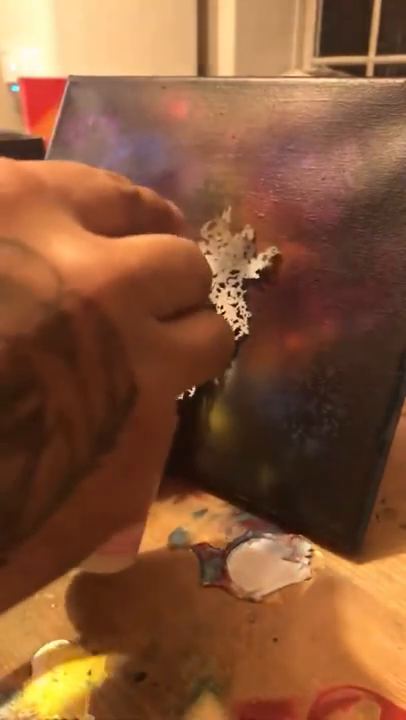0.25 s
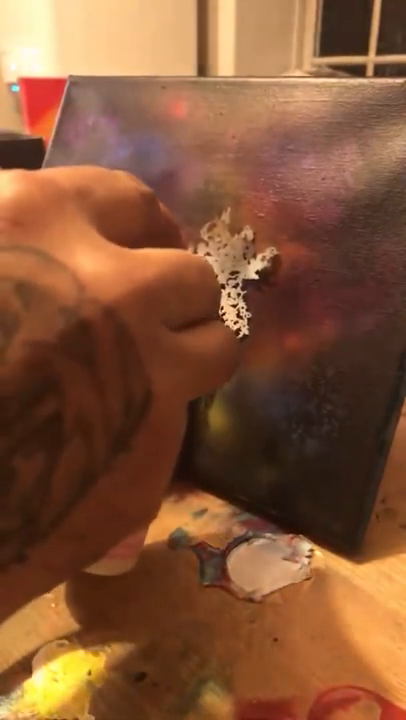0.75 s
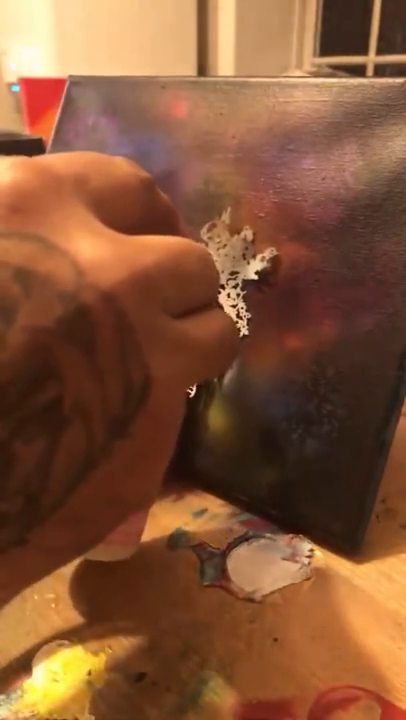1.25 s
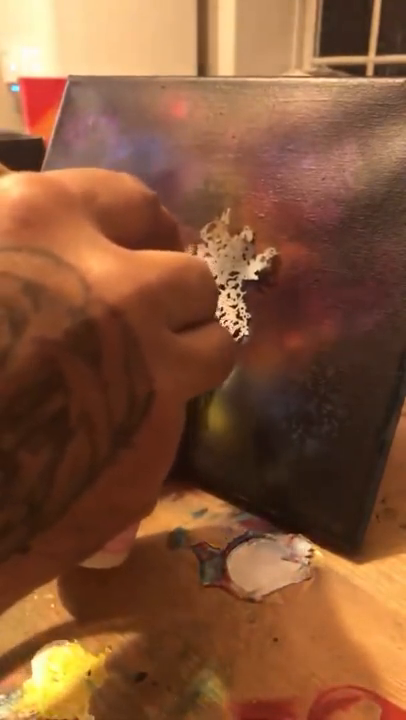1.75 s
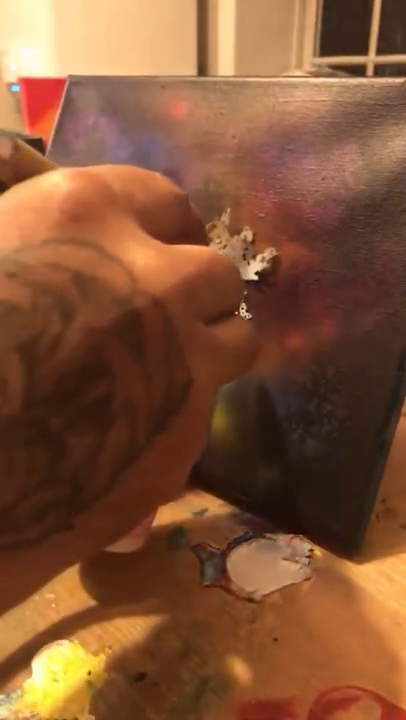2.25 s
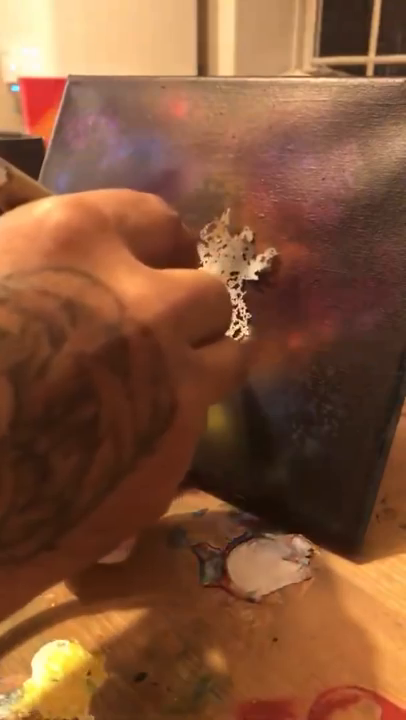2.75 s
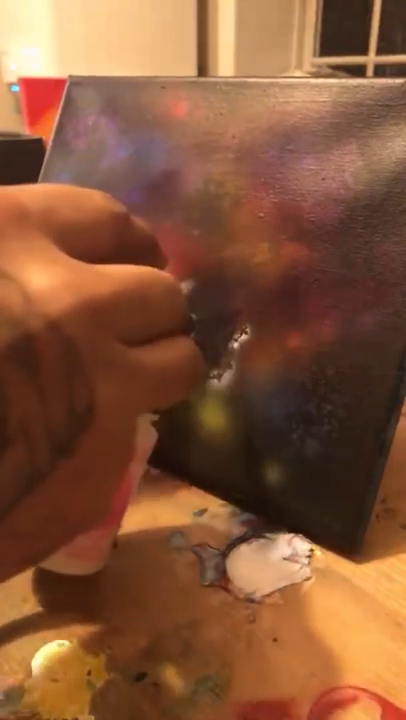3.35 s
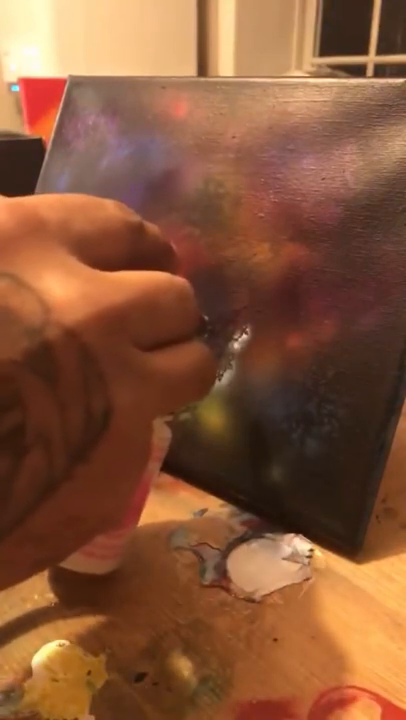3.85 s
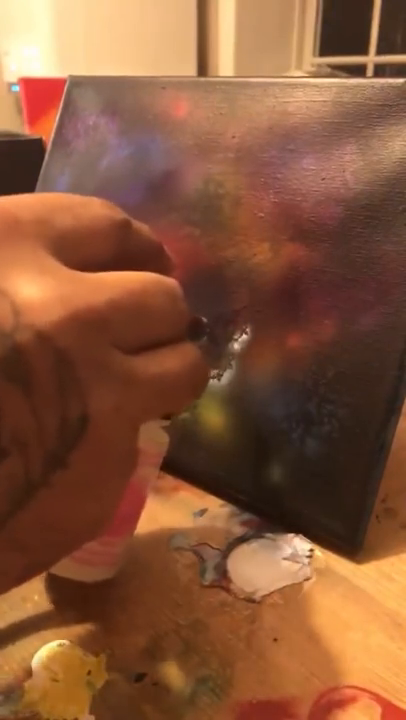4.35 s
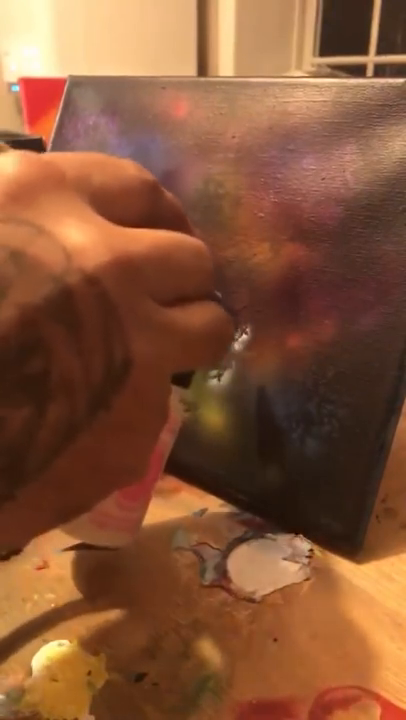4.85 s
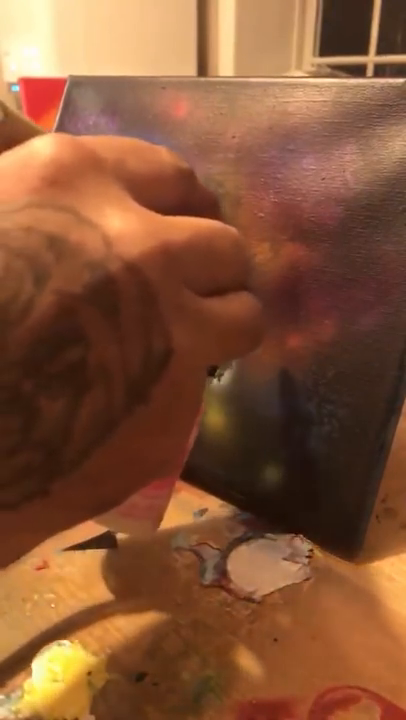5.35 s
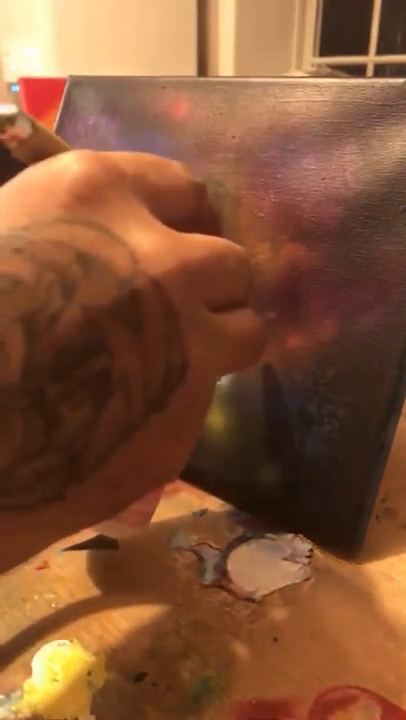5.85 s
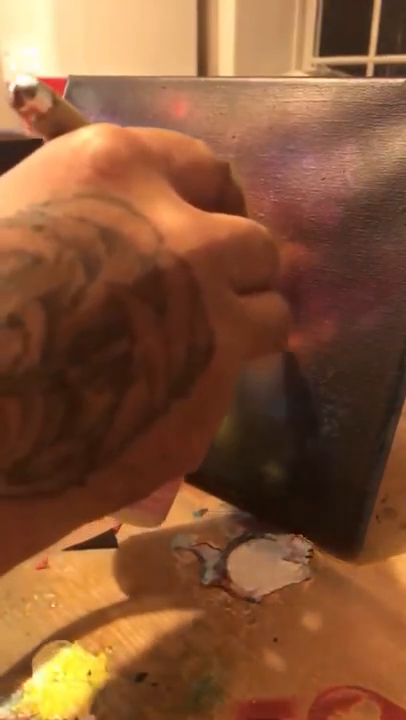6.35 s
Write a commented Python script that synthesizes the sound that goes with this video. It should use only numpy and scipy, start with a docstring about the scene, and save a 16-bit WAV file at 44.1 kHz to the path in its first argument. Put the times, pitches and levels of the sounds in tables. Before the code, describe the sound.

After a knock and half a second of quiet, an airbrush hisses loudly up close, spits, thumps, then drops to a faint air leak.

```python
"""Airbrush hissing at a canvas

An airbrush sprays close to a mono phone microphone in a quiet workshop.
The jet is filtered noise: its colour shifts as the hand turns, it spits and ends as a thin leak of air.
A paint blob snaps off the nozzle as short decaying tones, and the leak whistles as narrow noise.
The paint cup knocks and thumps as ringing modes; scrapes, scuffs and a thump's tail are low noise."""
import sys
import numpy as np
from scipy import signal
from scipy.fft import rfft, irfft, next_fast_len
from scipy.io import wavfile

SR = 44100
rng = np.random.default_rng(int(sys.argv[2]) if len(sys.argv) > 2 else 0)


def unload_audio(sound):
    """Save the sound as a 16-bit wav file, at the path given as the first command line argument."""
    columns = np.transpose(np.atleast_2d(sound))
    # keep every value between -1 and 1, then stretch to whole-number steps
    steps = np.round(np.clip(columns, -1, 1) * 32767)
    wavfile.write(sys.argv[1], SR, steps.astype(np.int16))


N = 290345

# steady sound of the room: [f/Hz, relative level per Hz/dB]
ROOM_COLOUR = [(24, -35.5), (40, -22), (144, -8), (288, -7), (329, -4.5), (431, -10.5), (3170, -12.5),
               (8500, -23.5), (11000, -62), (18700, -120)]
# low rumble below the hiss: [t/s, level/dB]
SCUFF_LEVEL = [(0, -78), (0.53, -104), (0.6, -76), (1.2, -76), (2.1, -67.5), (2.4, -74), (3.1, -77.5),
               (3.3, -74.5), (3.7, -72.5), (4.5, -72), (4.6, -77), (6.58, -79)]
# colour of that rumble: [f/Hz, relative level per Hz/dB]
SCUFF_SPECTRUM = [(30, -31.5), (80, -13.5), (200, -4), (500, 2), (900, 6.5), (1500, -36.5)]

# short scrapes on the table; the one at 4.282 s is the low noisy tail of a cup thump, fading in the room:
# [start t/s, length t/s, level/dB, low edge f/Hz, high edge f/Hz]
SCRAPES_AND_TAIL = [(0.642, 0.21, -67.5, 256, 700), (3.224, 0.2, -57.5, 486, 990),
                    (3.436, 0.028, -45, 182, 1410), (3.489, 0.075, -57.5, 192, 900),
                    (3.581, 0.055, -61, 695, 1100), (4.282, 0.077, -60.5, 350, 800),
                    (4.456, 0.044, -65, 594, 940)]
# taps on the table: [t/s, peak level/dB, centre of the contact's push f/Hz, width of the push/octaves]
TABLE_TAPS = [(0.0104, -28.5, 770, 2.05), (0.148, -63, 750, 0.78), (0.168, -57, 690, 0.82),
              (0.185, -57, 750, 1.3), (0.508, -66, 750, 1.5)]
# ringing modes of the table: [f/Hz, relative level/dB, time to fall by 60 dB t/s]
TABLE_MODES = [(198, -18, 0.039), (390, -2, 0.046), (500, -11.5, 0.021), (670, 2, 0.013),
               (850, -1.5, 0.024), (960, -2.5, 0.017), (1398, -10.5, 0.02), (1970, -11.5, 0.029),
               (2170, -11, 0.032), (2800, -8, 0.017), (2990, -4.5, 0.024), (3370, -14, .02)]
# thumps of the hollow cup: [t/s, peak level/dB, centre of the contact's push f/Hz, width of the push/octaves]
CUP_THUMPS = [(1.955, -55.5, 300, 0.76), (2.073, -45.5, 300, 0.43), (2.7945, -53, 111, 2.2),
              (4.2445, -25, 458, 1.63), (4.263, -41, 500, 1)]
# ringing modes of the cup: [f/Hz, relative level/dB, time to fall by 60 dB t/s]
CUP_MODES = [(101, -11, .08), (220, -6, 0.027), (268, -12.5, 0.042), (350, -18.5, 0.18), (465, 3.5, 0.044),
             (557, -3, 0.043), (750, -11, 0.04), (900, -21, 0.044)]

# a blob of paint snaps off the nozzle: [t/s, level/dB, ring f/Hz, time to fall by 60 dB t/s]
PAINT_SNAPS = [(2.7942, -14.5, 2260, 0.0083)]
# brief whistles of the leak: [start t/s, length t/s, level/dB, low edge f/Hz, high edge f/Hz]
LEAK_WHISTLES = [(5.06, .03, -53, 5820, 6130), (5.33, 0.029, -55, 6160, 6600),
                 (5.52, 0.031, -51.5, 5730, 5870), (5.59, 0.037, -56, 5500, 5800),
                 (6.33, .06, -62, 5460, 6200), (6.49, 0.073, -58.5, 5820, 6130)]

# spits of paint: [start t/s, burst level against the steady jet/dB, length/ms (strongest halfway)]
PAINT_SPITS = [(2.784, -1.5, 3.4), (2.793, -2, 3.8), (3.528, -6, 3), (3.545, -7, 3.5), (3.564, -8, 4),
               (3.649, -2, 3.5), (4.339, -7, 3.5), (4.3826, -4, 1.5), (4.9416, -1, 4.3), (5.536, -18, 6)]
# jet while the trigger is held down: [t/s, hiss level/dB, splash on the canvas level/dB]
SPRAY_LEVELS = [(0.6, -38.5, -48), (0.95, -36.5, -48), (1.75, -35.5, -48), (1.88, -33, -45.5),
                (2.1, -35.5, -47), (2.37, -33.5, -51.5), (2.491, -39.5, -58), (2.64, -37.5, -49),
                (2.7, -39, -53.5), (2.785, -34, -42.5), (2.81, -37, -53), (2.92, -35.5, -50.5),
                (3.1, -38.5, -52), (3.24, -34, -47.5), (3.4, -38, -60), (3.45, -38.5, -53),
                (3.5, -42, -53.5), (3.7, -39, -65.5), (4.1, -40, -68), (4.35, -40, -65.5),
                (4.49, -42, -67.5)]
# leak after the trigger is let go: [t/s, hiss level/dB, splash level/dB]
LEAK_LEVELS = [(4.58, -58, -72.5), (5.6, -57, -75.5), (5.84, -58, -74), (6.11, -60.5, -77.5),
               (6.58, -59, -76)]
# hand posture, counted along HISS_COLOURS: [t/s, posture number]
HAND_POSTURE = [(0, 0), (2.25, 0), (2.45, 1), (2.95, 1), (3.1, 2), (3.32, 2), (3.45, 3), (3.6, 3), (3.7, 4),
                (4.15, 4), (4.32, 5), (4.51, 5), (4.56, 6), (6.58, 6)]
# colour of the jet in each posture: [f/Hz, relative level per Hz/dB]
OPEN_COLOUR = [(1700, -19), (2250, -10.5), (2650, -2), (3000, 0), (3700, -6), (4200, -10.5), (4500, -9.5),
               (5150, -13.5), (5750, -13.5), (6300, -9), (6800, -6), (7050, -9.5)]
TURNING_COLOUR = [(1700, -24.5), (2300, -11.5), (2750, 0.5), (3050, 1.5), (3500, 0.5), (4000, -4),
                  (4350, -9.5), (4650, -4), (5450, -6.5), (6050, -4), (6300, -2.5), (6700, -1.5),
                  (7050, -3)]
RAISED_COLOUR = [(1700, -32), (2200, -16), (2700, -7), (3100, -4), (3350, -5.5), (3650, -3), (4000, -2.5),
                 (4250, -16.5), (4600, -10.5), (5050, -5.5), (5450, -11.5), (5900, -13), (6450, -3),
                 (7050, -5)]
SWINGING_COLOUR = [(1700, -19), (2200, -7.5), (2600, -5.5), (2900, 1), (3150, -3.5), (3350, -5),
                   (3800, -10), (4050, -16), (4400, -12.5), (4950, -3), (5650, -10.5), (5900, -9.5),
                   (6400, -11.5), (7050, -9)]
SHIELDED_COLOUR = [(1700, -23), (2500, -5.5), (2900, -1), (3300, -7.5), (3700, -8.5), (4180, -3),
                   (4400, -6), (5050, -1.5), (5600, -4), (5850, -13), (6100, -4.5), (6650, -13), (6950, -2),
                   (7050, -5)]
CLOSING_COLOUR = [(1700, -37), (2200, -15), (2560, -3), (2910, 1.5), (3300, -6), (3700, -5.5), (4000, -9),
                  (4250, -0.5), (4600, -11), (5080, 0), (5650, -9), (5900, -4), (6700, -14), (7050, -6)]
LEAK_COLOUR = [(1700, -23), (2200, -17.5), (2600, -9.5), (3000, -5.5), (3250, -10), (3450, -9), (3900, -15),
               (4600, -8.5), (4800, -9), (5350, -3.5), (5600, -5), (5850, -3), (6400, -4.5), (7050, -13)]
# posture 0 is open spray, 6 is the leak
HISS_COLOURS = (OPEN_COLOUR, TURNING_COLOUR, RAISED_COLOUR, SWINGING_COLOUR,
                SHIELDED_COLOUR, CLOSING_COLOUR, LEAK_COLOUR)
# colour of the splash on the canvas: [f/Hz, relative level per Hz/dB]
SPLASH_COLOUR = [(60, -27), (500, -26), (800, -8), (1050, 1.5), (1260, -4.5), (1600, 3), (2050, -3.5),
                 (2500, -17), (3500, -46)]

# overall tone: treble falls steeply above 7 kHz, with a faint bump near 8950 Hz: [f/Hz, gain/dB]
TONE_RESPONSE = [(25, -11.5), (120, -1), (7050, 0), (7350, -19), (8000, -26.5), (8700, -41), (8950, -31.5),
                 (9400, -46.5), (9700, -75.5)]

ROOM_DB, SELF_NOISE_DB, CUTOFF_HZ = -79, -95, 15700
# the valve opens: a quick rush, then up to full flow
PRESS_S, FIRST_RUSH_S, FULL_S = 0.529, 0.02, 0.06   # the last two count from the press
SHUT_DB, FIRST_RUSH_DB = -45, -6.5
# the valve falls back to the leak
RELEASE_S, CLOSING_S = 4.511, 0.041
# unsteady flow while spraying: typical swing and speed
HISS_WAVER_DB, SPLASH_WAVER_DB, WAVER_RATE_HZ = 0.57, 1.5, 10.4
SPLASH_LAG_S = 0.0026   # the jet first reaches the canvas a little later
CURVE_STEP = 16   # samples between the values of a slow curve


def from_db(db):
    """Turns decibels into gain."""
    return 10 ** (np.asarray(db) / 20)


def rms_one(x):
    """Scales a sound to an rms (average strength) of one."""
    return x / np.sqrt(np.mean(x ** 2) + 1e-20)


def in_time(rows):
    """Joins the points of a table into curves, one value a sample for each column."""
    s, *columns = np.transpose(rows)
    return [np.interp(np.arange(N) / SR, s, c, left=c[0]) for c in columns]


def at_hz(points, hz):
    """Reads a spectrum between its points, on a log-frequency axis."""
    point_hz, point_db = np.array(points).T
    return np.interp(np.log(hz + 1), np.log(point_hz), point_db)


def coloured(x, spectrum):
    """Filters a sound by making each frequency louder or softer."""
    size = next_fast_len(N)
    hz = np.arange(size // 2 + 1) * SR / size
    filtered = rfft(x, size, axis=-1) * from_db(at_hz(spectrum, hz))
    return irfft(filtered, size, axis=-1)[..., :N]


def drift(rate_hz):
    """Slow chance: noise smoothed twice by a one-pole low-pass, with a typical swing of one."""
    r = np.exp(-2 * CURVE_STEP * np.pi * rate_hz / SR)
    noise = rng.standard_normal(N // CURVE_STEP + 3002)
    smooth = signal.lfilter([1], [1, -2 * r, r * r], noise)
    return rms_one(smooth[3000:])   # skip the filter's start-up


def full(slow):
    """Stretches a slow curve to one value a sample."""
    return np.interp(np.arange(N) / CURVE_STEP, np.arange(len(slow)), slow)


def room_tone():
    """Steady, mostly low noise of the quiet workshop."""
    return from_db(ROOM_DB) * rms_one(coloured(rng.standard_normal(N), ROOM_COLOUR))


def workshop(x, t60=0.11):
    """Echoes blend into a short fading tail, here noise that starts 6 ms after the sound."""
    t = np.arange(round(0.4 * SR)) / SR
    tail = rng.standard_normal(len(t)) * from_db(-60 * t / t60) * (t > 0.006)
    return signal.fftconvolve(x, tail / np.sqrt(np.sum(tail ** 2)))[:N]


def scuff():
    """Slightly lumpy low noise from air and hand moving over the table."""
    lumps_db = full(2.5 * drift(25))
    rumble = rms_one(coloured(rng.standard_normal(N), SCUFF_SPECTRUM))
    return from_db(in_time(SCUFF_LEVEL)[0] + lumps_db) * rumble


def strokes(rows):
    """Gritty band noise that catches at once and lets go a little more slowly."""
    t, out = np.arange(N) / SR, 0
    grit = rng.standard_normal(N) * from_db(full(2.5 * drift(60)))
    for s, length, db, low_hz, high_hz in rows:
        envelope = np.interp(t, [s, s + 0.007, s + length, s + length + 0.025], [0, 1, 0.55, 0])
        band = signal.butter(3, [low_hz, high_hz], "band", fs=SR, output="sos")
        out = out + from_db(db) * envelope * rms_one(signal.sosfilt(band, grit))
    return out


def scrapes_and_tail():
    """Short strokes of low noise: scrapes, and the noisy tail of a cup thump fading in the room."""
    return strokes(SCRAPES_AND_TAIL)


def knocks(blows, modes):
    """Each contact strikes every mode with a strength of its own; modes far from the push speak less."""
    out = np.zeros(N)
    t = np.arange(round(0.3 * SR)) / SR
    chance_db = rng.normal(0, 1, (len(blows), len(modes)))
    for (s, peak_db, push_hz, octaves), own_db in zip(blows, chance_db):
        ring = 0
        for (hz, db, t60), own in zip(modes, own_db):
            ring = ring + from_db(db + own - 60 * t / t60) * np.sin(2 * np.pi * hz * t)
        edges_hz = push_hz * 2.0 ** np.array([-octaves / 2, octaves / 2])
        push = signal.butter(2, edges_hz, "band", fs=SR, output="sos")
        blow = signal.sosfilt(push, ring)
        i = round(s * SR)
        out[i:i + len(t)] += from_db(peak_db) * blow / np.abs(blow).max()
    return out


def table_knocks():
    """Taps set the wooden table ringing for a moment."""
    return knocks(TABLE_TAPS, TABLE_MODES)


def cup_thumps():
    """Contacts set the hollow paint cup ringing, lower than the table."""
    return knocks(CUP_THUMPS, CUP_MODES)


def snap():
    """A paint blob lets go: three tones start sharply and fade, the highest twice as fast."""
    out = 0
    for s, level_db, hz, t60 in PAINT_SNAPS:
        t = np.clip(np.arange(N) / SR - s, 0, None)
        fade = from_db(-60 * t / t60)
        crack = np.sin(2 * np.pi * hz * t)
        crack += 0.47 * np.sin(2 * np.pi * 6300 * t) * fade
        crack += 0.34 * np.sin(2 * np.pi * 1200 * t)
        attack = 1 - np.exp(-t / 0.00067)
        out = out + from_db(level_db) * fade * crack * attack
    return out


def whistles():
    """The leaking air whistles briefly: strokes of narrow, high noise."""
    return strokes(LEAK_WHISTLES)


def flow():
    """Hiss and splash levels in dB: the valve opens, the spray wavers, the valve closes to a leak."""
    t = np.arange(N) / SR
    closed = np.clip((t - RELEASE_S) / CLOSING_S, 0, 1)
    wavers, lags = (HISS_WAVER_DB, SPLASH_WAVER_DB), (0, SPLASH_LAG_S)
    levels = []
    for spray_db, leak_db, waver_db, lag in zip(in_time(SPRAY_LEVELS), in_time(LEAK_LEVELS), wavers, lags):
        spraying_db = spray_db + waver_db * full(drift(WAVER_RATE_HZ))
        opening_db = np.interp(t - PRESS_S - lag, [0, FIRST_RUSH_S, FULL_S], [SHUT_DB, FIRST_RUSH_DB, 0])
        levels.append((1 - closed) * spraying_db + closed * leak_db + opening_db)
    return levels


def turbulence(flutter_db, sputter_db):
    """Rushing air as white noise that flutters slowly, sputters fast and bursts at each spit."""
    t = np.arange(N) / SR
    gain = from_db(full(flutter_db * drift(6.7) + sputter_db * drift(200)))
    for s, burst_db, ms in PAINT_SPITS:
        late = np.clip(t - s, 0, None) * 2000 / ms   # reaches 1 after half the length
        gain += from_db(burst_db) * late * np.exp(1 - late)
    return gain * rng.standard_normal(N) * (t > PRESS_S)


def jet():
    """Overlapping bands of turbulent noise, weighted by the posture's colour and by the splash."""
    size = next_fast_len(N)
    hz = np.arange(size // 2 + 1) * SR / size
    centres = np.r_[np.geomspace(60, 800, 8), np.arange(920, 7200, 150)]
    spectrum = rfft(turbulence(flutter_db=0.49, sputter_db=1.0), size)
    hiss_db, splash_db = [c[::CURVE_STEP] for c in flow()]
    posture = in_time(HAND_POSTURE)[0][::CURVE_STEP]
    count = len(posture)

    colours = np.array([at_hz(c, centres) for c in (*HISS_COLOURS, SPLASH_COLOUR)])
    power = from_db(2 * colours) @ np.gradient(centres) * 2 / SR
    colours -= 10 * np.log10(power)[:, None]   # each colour passes unit power

    out, near = 0, drift(4.6)[:count]
    for k, centre in enumerate(centres):
        near = 0.8 * near + 0.6 * drift(5)[:count]   # neighbouring bands swell together
        flicker_db = 0.88 * near + 1.8 * drift(35)[:count]
        only_this_band = np.arange(len(centres)) == k
        band = irfft(spectrum * np.interp(hz, centres, only_this_band), size)[:N]
        colour_db = np.interp(posture, range(len(HISS_COLOURS)), colours[:-1, k])
        hiss = from_db(colour_db + hiss_db) / (1 + (1700 / centre) ** 6)   # little hiss in the bass
        splash = from_db(colours[-1, k] + splash_db)
        out = out + full(np.hypot(hiss, splash) * from_db(flicker_db)) * band
    return out


def scene():
    """Adds everything up; one microphone feeds both channels."""
    blows = table_knocks() + cup_thumps()
    background = room_tone() + scuff()
    handling = scrapes_and_tail() + blows + from_db(-7) * workshop(blows)
    airbrush = snap() + whistles() + jet()
    mono = background + handling + airbrush
    return np.array([mono, mono])


def record(dry):
    """The treble falls steeply above 7 kHz, a faint electronic hiss is added and the top is cut."""
    noisy = coloured(dry, TONE_RESPONSE) + from_db(SELF_NOISE_DB) * rng.standard_normal(N)
    top_cut = signal.cheby2(12, 60, CUTOFF_HZ, fs=SR, output="sos")
    return signal.sosfilt(top_cut, noisy)


dry = scene()
out = record(dry)
unload_audio(out)
```